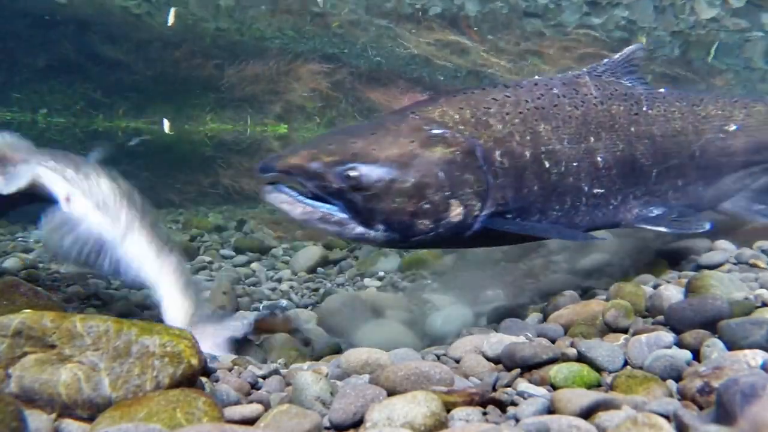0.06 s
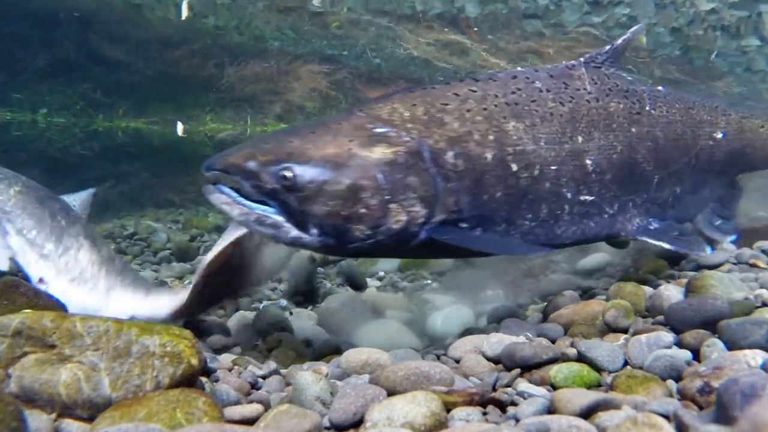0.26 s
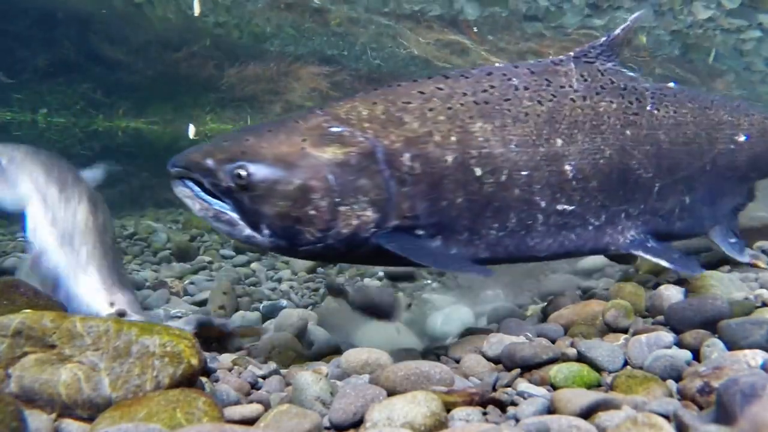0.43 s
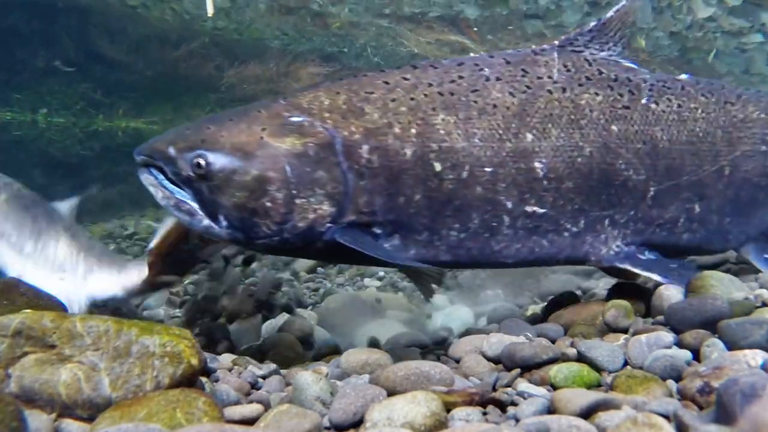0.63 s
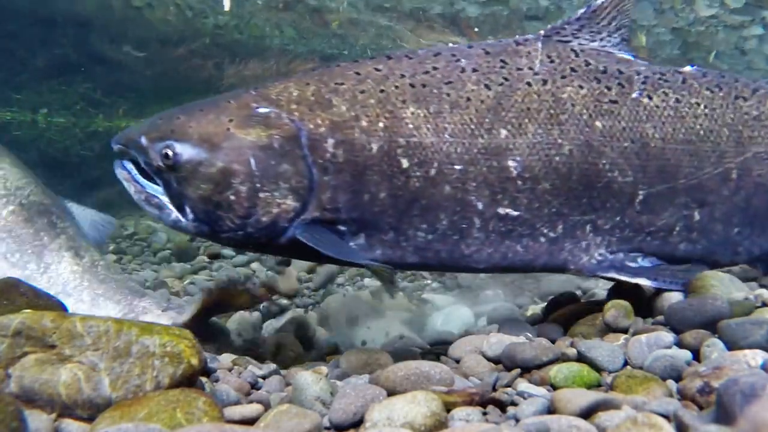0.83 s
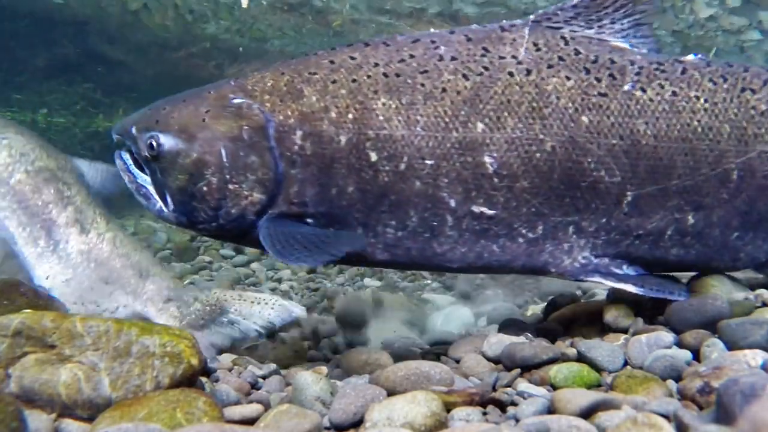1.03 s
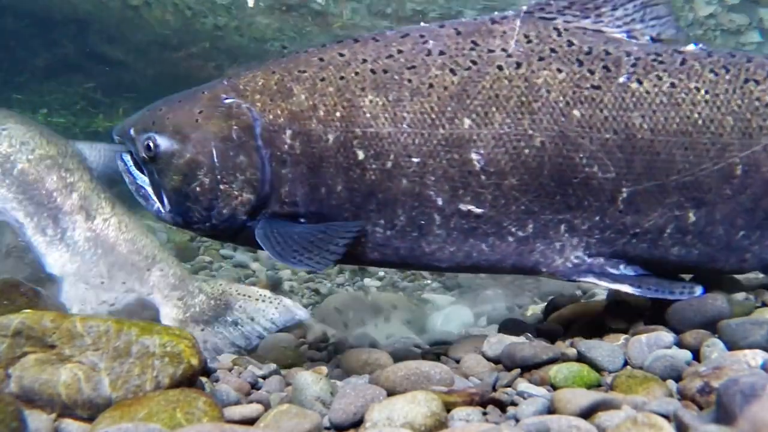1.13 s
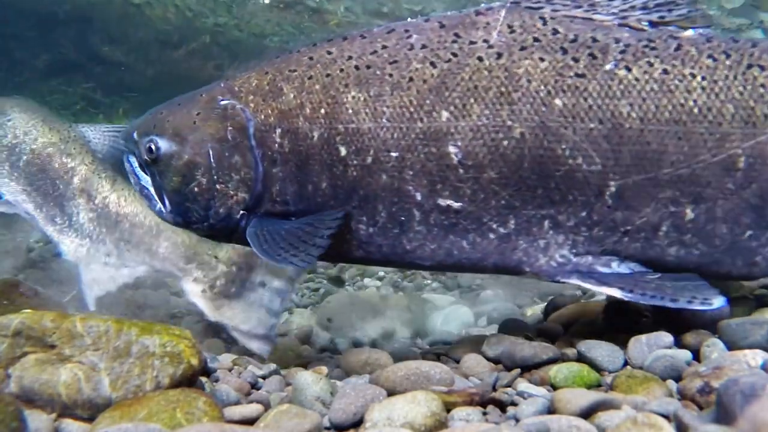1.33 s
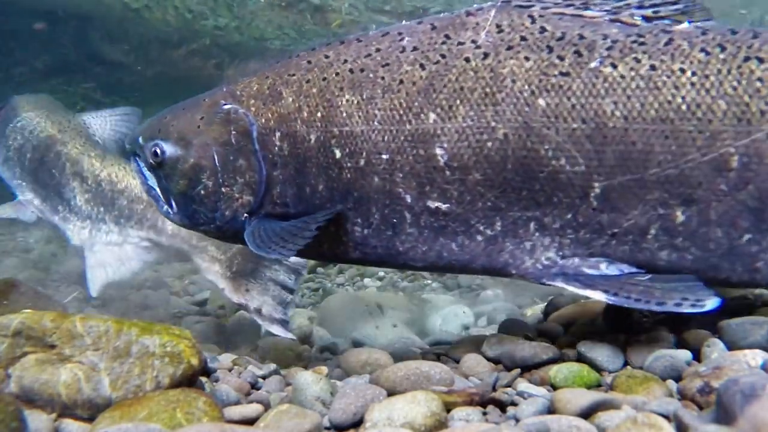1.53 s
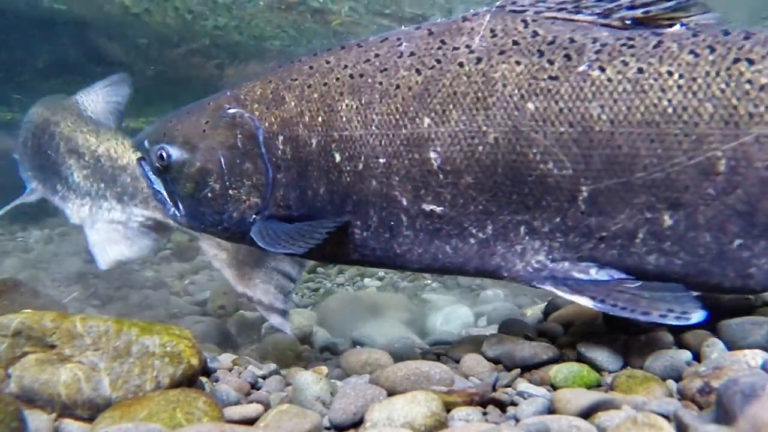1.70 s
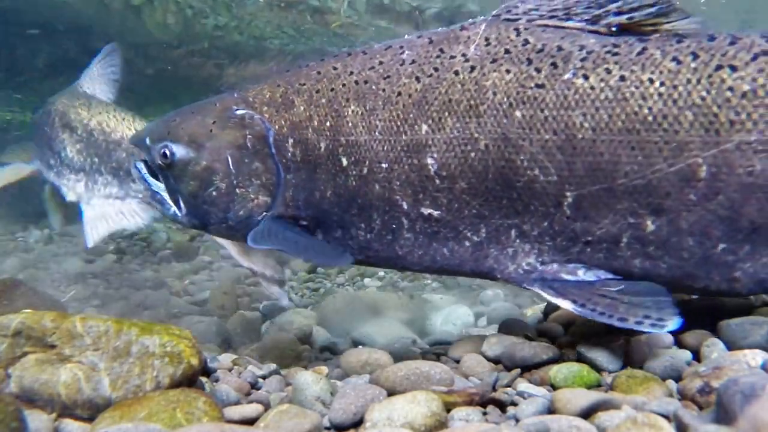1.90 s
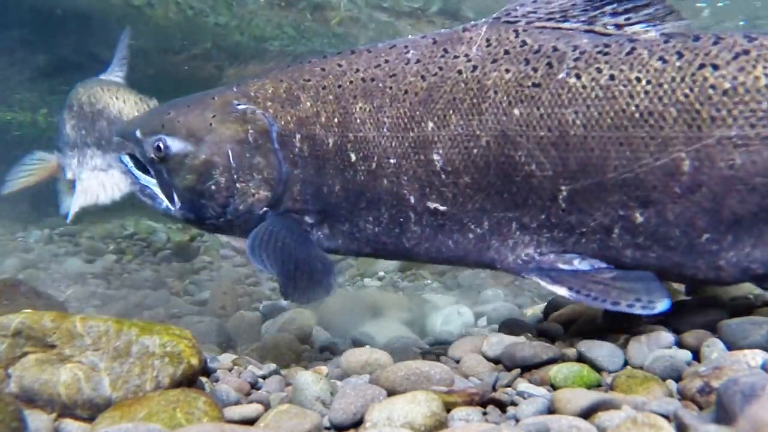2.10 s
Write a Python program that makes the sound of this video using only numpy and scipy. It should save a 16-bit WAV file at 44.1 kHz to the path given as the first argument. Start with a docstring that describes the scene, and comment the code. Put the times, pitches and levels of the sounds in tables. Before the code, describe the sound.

Pebbles click and rattle underwater as a salmon sweeps the riverbed with its tail. Dull knocks turn into a brighter clatter with hissing sand, a few bubbles ring, and the stones settle, close to the microphone over a faint current.

```python
"""A gravel riverbed, heard from a camera under water, close to a salmon sweeping it with its tail.
Pebbles knock together in short dry clicks over a patter of stirred grit and hissing sand.
A few air bubbles ring, and the pushed water rumbles softly against the housing over the steady river.
One microphone hears it all; the nearest knocks overload it."""
import sys
import numpy as np
from scipy.fft import rfft, irfft, next_fast_len
from scipy.io import wavfile
from scipy.ndimage import map_coordinates

SR = 44100
rng = np.random.default_rng(int(sys.argv[2]) if len(sys.argv) > 2 else 0)


def output_pcm(signal):
    """Save a mono or channel-first signal as 16-bit PCM at the path in sys.argv[1].

    Samples are clipped to [-1, 1] before scaling.
    """
    pcm = np.clip(np.atleast_2d(signal).T, -1, 1) * 32767
    wavfile.write(sys.argv[1], SR, np.round(pcm).astype(np.int16))


N = 94815

# how much loose gravel is moving: (time [s], relative level [dB])
BED_STIR = [(0, -45.5), (.12, -48.5), (.15, -38.5), (.26, -38.5), (.35, -41.5), (.42, -30), (.51, -42.5),
            (.58, -32), (.67, -28), (.8, -35), (.87, -33), (.94, -32), (1.07, -41.5), (1.24, -35.5),
            (1.49, -41), (1.68, -43.5), (1.82, -47.5), (2.15, -49)]


def amp(db):
    """Decibels to amplitude."""
    return 10 ** (np.asarray(db) / 20)


def along(points, hz):
    """Read (Hz, value) points on a log frequency axis."""
    freqs, values = np.transpose(points)
    return np.interp(np.log(hz + 1), np.log(freqs + 1), values)


def curve(rows):
    """One value per sample from (s, value) rows."""
    return np.interp(np.arange(N) / SR, *np.transpose(rows))


def wobble(rate):
    """A smooth random curve, rate knots a second."""
    return map_coordinates(rng.standard_normal(int(N * rate / SR) + 4), [np.arange(N) * rate / SR])


def filtered(x, response):
    """Filter x by a gain given as a function of frequency."""
    size = next_fast_len(N + SR // 2)
    return irfft(rfft(x, size) * response(np.fft.rfftfreq(size, 1 / SR)), size)[:N]


def noise(spectrum):
    """Noise of rms 1, coloured by (Hz, dB) points."""
    x = filtered(rng.standard_normal(N), lambda hz: amp(along(spectrum, hz)))
    return x / np.sqrt(np.mean(x ** 2) + 1e-20)


def causal(gain_db):
    """The fastest-rising response with this gain."""
    cepstrum = irfft(np.log(amp(gain_db)))
    half = len(cepstrum) // 2
    return np.exp(rfft(np.r_[cepstrum[0], 2 * cepstrum[1:half], np.zeros(half)]))


def river():
    """The current makes a faint, steady rush around the microphone."""
    # flowing water: (frequency [Hz], relative level [dB])
    spectrum = [(30, 3), (110, -7.5), (250, -3), (600, -5), (1300, -10.5), (2600, -14.5), (7000, -29),
                (15000, -45)]
    return amp(-50.5) * noise(spectrum)


def tail_surges():
    """Each sweep of the tail pushes water against the housing in a low rumble."""
    # strength of the push: (time [s], relative level [dB])
    surge = [(0, -47), (.12, -46.5), (.16, -38), (.24, -45), (.32, -42.5), (.5, -41.5), (.56, -45.5),
             (.6, -35), (.69, -36.5), (.77, -44), (.83, -41), (.96, -47.5), (1.1, -36), (1.16, -47.5),
             (1.21, -38.5), (1.36, -45), (1.55, -45.5), (2.15, -52.5)]
    # water on the housing: (frequency [Hz], relative level [dB])
    rumble = [(15, -20), (30, -15.5), (55, -1), (80, -1), (100, -5), (120, -1), (150, -8.5), (250, -18),
              (500, -22), (1500, -51)]
    return amp(curve(surge) + 1) * noise(rumble)


def sand():
    """The finest grains merge into a fluttering hiss that follows the stirring of the bed."""
    # hiss of the grains: (frequency [Hz], relative level [dB])
    spectrum = [(200, -15.5), (600, -0.5), (1070, -3), (1250, -3), (1800, 1), (2500, 6.5), (3400, -1),
                (5200, -9), (7100, -7.5), (8200, -2.5), (9300, -7.5), (11300, -10), (14000, -1),
                (15500, -24)]
    gain_db, flutter_db, flutter_per_s = -6.5, 3.5, 220
    return noise(spectrum) * amp(curve(BED_STIR) + gain_db + flutter_db * wobble(flutter_per_s))


def stone_clicks(times, levels_db, tilts):
    """Each contact is an impulse and its echoes, coloured by the stone, the water and the housing."""
    # a click heard through water and housing: (frequency [Hz], gain [dB])
    click_colour = [(100, -39.5), (300, -25.5), (600, -13), (900, -20), (1070, -9), (1230, -17), (1560, -6),
                    (1780, -11), (1970, -2), (2600, 2), (3100, -3.5), (4200, -8), (5200, -3.5), (5750, -8),
                    (6200, -3), (7150, -3.5), (8100, -18), (9200, -9.5), (11300, -22.5), (14000, -16),
                    (15500, -20.5)]
    # echoes off the stones nearby, strongest for short waves: (frequency [Hz], gain [dB])
    scatter_colour = [(2500, -8.5), (5000, -0.5), (12000, 3)]
    knee_hz, knee_sharpness = 3320, 4.68  # tilt and smear act above this corner
    smear_s = 0.00028  # the housing's delay per octave
    stone_db, stone_knots = 2.5, 24  # each stone's own random colour
    scatter_t60, wash_t60, wash_db = 0.01, 0.0317, -9  # wash: diffuse echoes between bed and surface
    surface_s, surface_spread_s, surface_db = 0.0064, 0.00059, -16.5  # first echo off the surface
    size, head = 2048, 132  # samples; the level is the rms of the first 3 ms
    hz, t = np.fft.rfftfreq(size, 1 / SR), np.arange(size) / SR
    octaves = np.log2(1 + (hz / knee_hz) ** knee_sharpness) / knee_sharpness
    smear = np.exp(-2j * np.pi * np.cumsum(smear_s * octaves) * SR / size)
    body_db, scatter = along(click_colour, hz), amp(along(scatter_colour, hz))
    fade = np.clip(2 * (1 - t / t[-1]), 0, 1)

    def echoes(t60):
        """Spectrum of dense echoes dying away."""
        decay = amp(-60 * t / t60)
        return rfft(rng.standard_normal(size) * decay) / np.linalg.norm(decay)

    out = np.zeros(N + size)
    for start, db, tilt in zip(times, levels_db, tilts):
        own_colour = np.interp(hz, np.linspace(0, SR / 2, stone_knots), rng.standard_normal(stone_knots))
        contact = causal(body_db + tilt * octaves + stone_db * own_colour)
        surface_delay = surface_s + surface_spread_s * rng.normal()
        surface_echo = amp(surface_db) * np.exp(-2j * np.pi * hz * surface_delay)
        path = 1 + scatter * echoes(scatter_t60) + amp(wash_db) * echoes(wash_t60) - surface_echo
        click = fade * irfft(path * smear * contact)
        head_rms = np.sqrt(np.mean(click[:head] ** 2))
        out[int(np.clip(start * SR, 0, N)):][:size] += amp(db) * click / head_rms
    return out[:N]


def grit():
    """Small stones patter as the bed is stirred; coarse ones move first, fine ones settle last."""
    # brightness of the moving grit: (time [s], treble tilt [dB per octave])
    brightness = [(.1, -7.5), (.45, -0.5), (.7, 2.5), (1.2, 1.5), (2, 2)]
    clicks_per_s, gain_db, spread_db = 420, -7.5, 6.5
    tilt_spread = 5.86  # dB per octave
    count = int(clicks_per_s * N / SR)
    jitter, strength, colour = rng.random((count, 3)).T
    times = (np.arange(count) + 2 * jitter) / clicks_per_s
    stir_db = np.interp(times, *np.transpose(BED_STIR))
    levels_db = stir_db + gain_db + spread_db * np.sqrt(12) * (strength - 0.5)
    tilts = np.interp(times, *np.transpose(brightness)) + tilt_spread * (2 * colour - 1)
    return stone_clicks(times, levels_db, tilts)


def pebbles():
    """Stones thrown up by the tail knock together and fall back, close to the microphone."""
    # knocks, dull if heavy, bright if small: (time [s], level [dB], treble tilt [dB per octave])
    knocks = [(0.0789, -24, 0.5), (0.0946, -28.5, -5), (0.1334, -32, 3), (0.1904, -26.7, -19),
              (0.2119, -19, -32), (0.2492, -28, 11), (0.2622, -30, -27), (0.2726, -48.5, 3.25),
              (0.2989, -31, -22), (0.3304, -31, 4.83), (0.3456, -12.9, -47), (0.3711, -15, -13),
              (0.3744, -11, -16), (0.406, -12, -9.5), (0.4232, -26, -20), (0.445, -20.5, -10),
              (0.4536, -16.5, -26), (0.469, -27.4, -24), (0.5798, -16, -11), (0.591, -22, -8),
              (0.6089, -8, -5.5), (0.6216, -16.5, 4.2), (0.6338, -25, 7), (0.6595, -26, -2.4),
              (0.6649, -24.5, 1), (0.6681, -9, -0.9), (0.683, -22.5, 1.5), (0.6955, -23, 6.5),
              (0.7064, -11.5, 11.5), (0.7103, -11, 3.5), (0.716, -21.5, 2.28), (0.7588, -28, -9),
              (0.7711, -18.5, 0), (0.7798, -21.5, 13.5), (0.8321, -24, 4.5), (0.861, -24.5, 0.8),
              (0.901, -30, 1.7), (0.9142, -16.5, 2.5), (0.9553, -15, -0.86), (0.958, -18, -0.5),
              (0.9653, -25, -5), (0.9832, -19, 1.6), (1.0077, -17.5, -0.5), (1.0113, -19.5, 0),
              (1.0167, -19, 1.5), (1.03, -17.5, 3.22), (1.0373, -17, 1), (1.0428, -22.5, -3),
              (1.061, -20, 2), (1.0742, -22.5, -2), (1.0808, -8, -3), (1.1004, -16.5, -8),
              (1.1199, -21.5, 5.5), (1.1679, -25, 0.3), (1.1867, -27, 4), (1.202, -16.1, -18),
              (1.2069, -23.9, -5), (1.2175, -20, 9), (1.2217, -28.5, 4), (1.2356, -14.5, -8.5),
              (1.263, -26.5, -2.5), (1.2954, -23.5, 3.5), (1.3268, -18, -6), (1.3505, -24.5, 5),
              (1.3746, -21.9, -13.5), (1.4011, -24, -4), (1.4229, -19.5, 1), (1.4366, -21.5, 2.04),
              (1.4493, -21.3, -1.2), (1.4815, -26.5, -1), (1.4891, -22, 4), (1.5057, -27.5, 7.5),
              (1.5369, -28, 4), (1.5545, -29, 3.5), (1.5735, -25.5, 3.5), (1.5957, -28.5, 8.1),
              (1.5985, -22.0, 4), (1.632, -33, 7), (1.6383, -29, 4), (1.6423, -16, 1.8), (1.6902, -22, -1),
              (1.7643, -28, 4.0), (1.7803, -31.5, -1), (1.8357, -31.5, 7.5), (1.8515, -37.5, -3.5),
              (1.8995, -32.5, -1.5), (1.9106, -34.5, 2), (1.9409, -31.5, 3), (1.9917, -33, 6.9),
              (2.0434, -36.5, 2.6)]
    return stone_clicks(*np.transpose(knocks))


def bubbles():
    """Each freed bubble rings at its own pitch, which sags a little and wavers in the current."""
    # ringing air bubbles: (time [s], pitch [Hz], level [dB], t60 [s], attack [s])
    rings = [(1.192, 1903, -16.5, 0.033, 0.00063), (1.271, 675, -19, 0.076, 0.0046),
             (1.278, 1360, -30.5, .05, .003), (1.284, 489, -21, 0.0384, 0.00133),
             (1.288, 696.5, -8, 0.061, 0.0065), (1.319, 636, -19.5, 0.171, 0.0018),
             (1.339, 1314, -29.5, 0.06, 0.002), (1.372, 618, -23.5, .16, 0.00133),
             (1.392, 854, -29, 0.12, 0.0071), (1.481, 640, -23, 0.1864, 0.0022),
             (1.481, 1617, -15, 0.06, 0.00162)]
    sag_share, sag_s = 0.0258, 0.028
    waver_share, waver_per_s = 0.02, 112
    out, t = np.zeros(N + SR), np.arange(SR // 4) / SR
    sag = sag_share * (1 - np.exp(-t / sag_s))
    for start, hz, db, t60, attack in rings:
        pitch = hz * (1 - sag + waver_share * wobble(waver_per_s)[:len(t)])
        envelope = amp(db - 60 * t / t60) * (1 - np.exp(-t / attack))
        out[round(start * SR):][:len(t)] += envelope * np.sin(2 * np.pi * np.cumsum(pitch) / SR)
    return out[:N]


def scene():
    """Everything reaches one microphone by the riverbed."""
    return (river() + tail_surges() + pebbles() + bubbles() + sand() + grit())[None]


def record(dry):
    """The nearest knocks softly overload the camera, which keeps nothing above its band limit."""
    ceiling, top_hz = 1.025, 15600
    saturated = dry[0] / (1 + np.abs(dry[0] / ceiling) ** 6) ** (1 / 6)
    return filtered(saturated, lambda hz: 1 / (1 + (hz / top_hz) ** 70))[None]


dry = scene()
out = record(dry)
output_pcm(out)
```